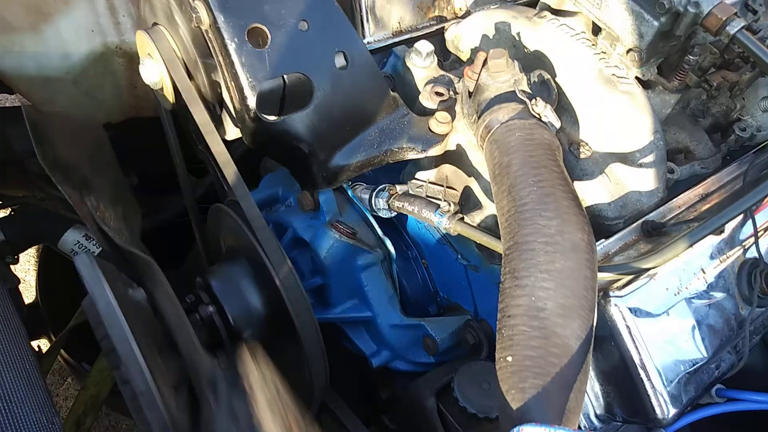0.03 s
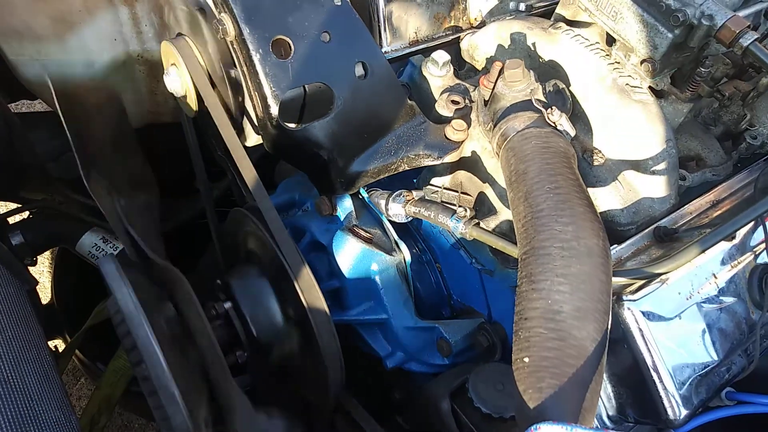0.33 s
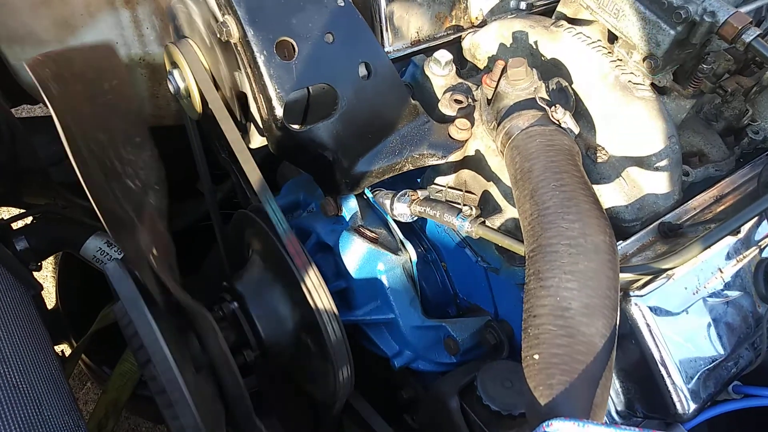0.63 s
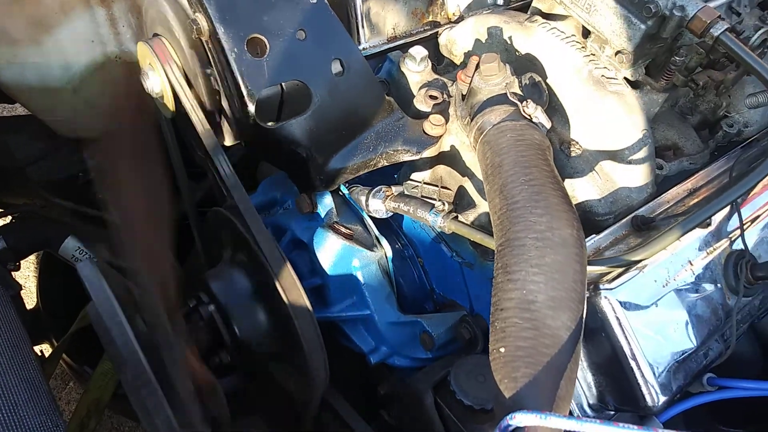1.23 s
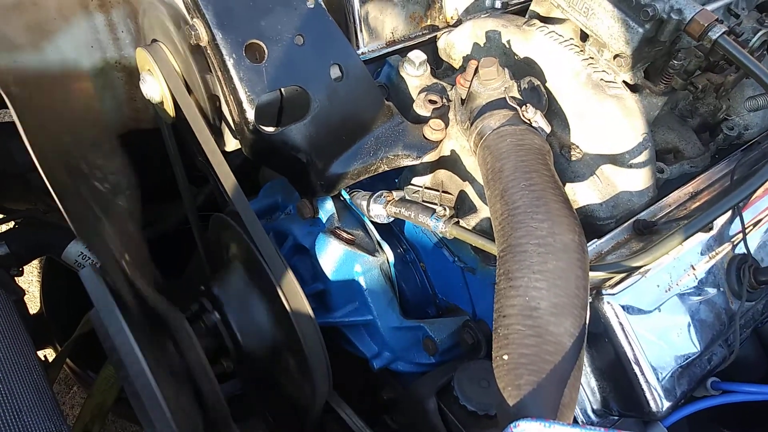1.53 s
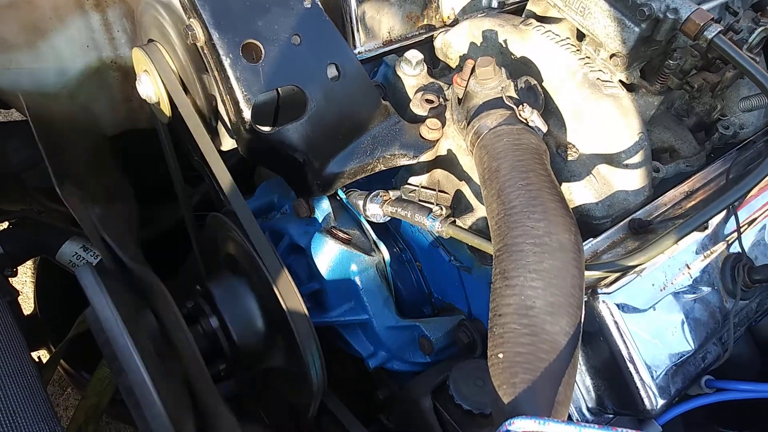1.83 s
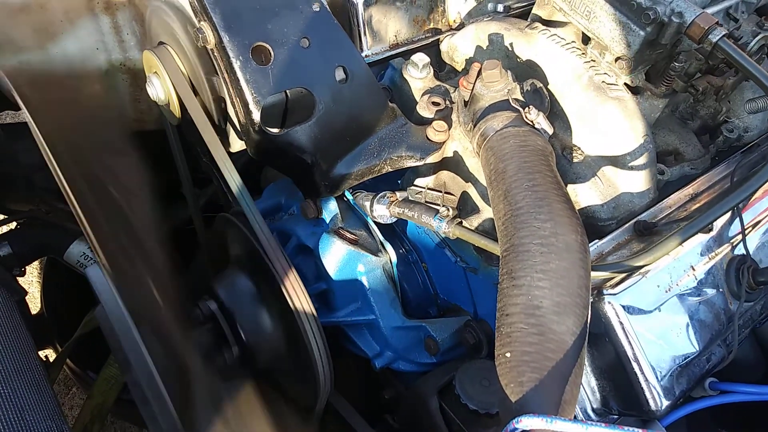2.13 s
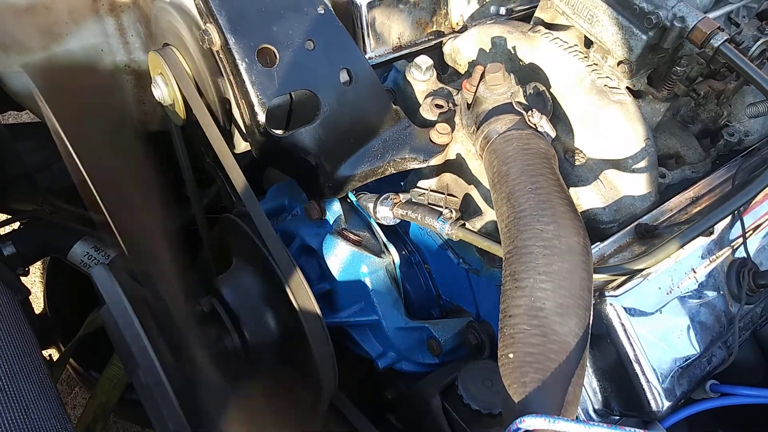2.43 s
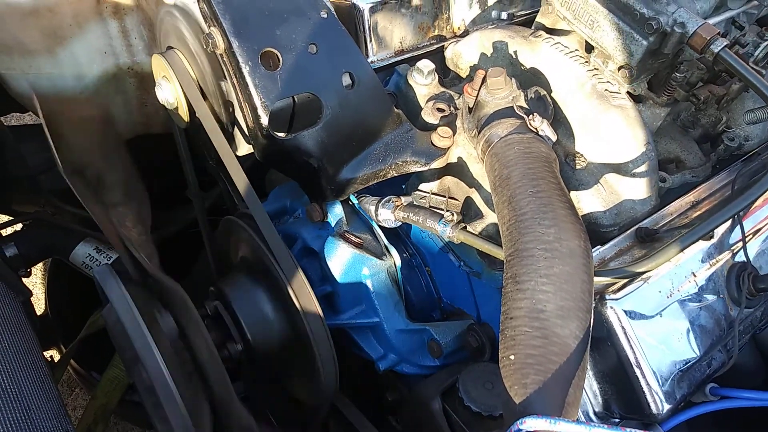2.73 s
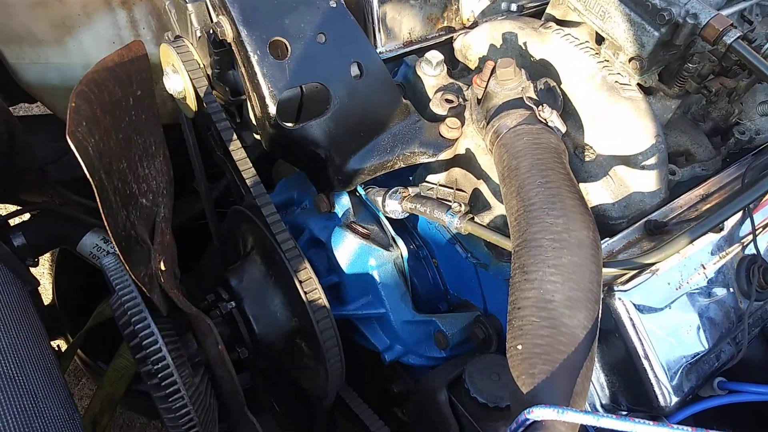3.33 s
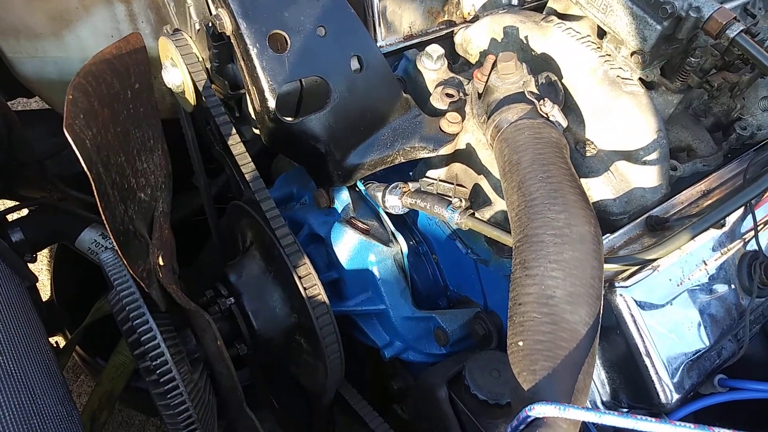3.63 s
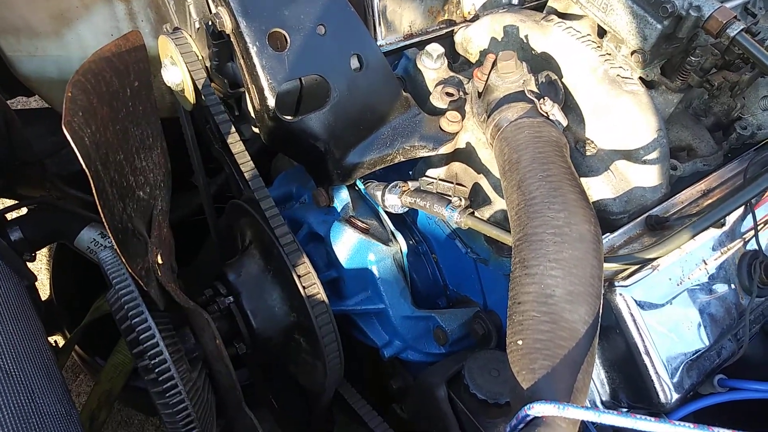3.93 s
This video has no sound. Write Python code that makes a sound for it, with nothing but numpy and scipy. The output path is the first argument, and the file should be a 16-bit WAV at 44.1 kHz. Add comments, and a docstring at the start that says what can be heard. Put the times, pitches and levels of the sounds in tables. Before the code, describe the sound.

A car engine throbs unevenly up close, misfires with pops and booms, then dies.

```python
"""Air rushes and throbs into a rough car engine, close by under an open hood; the intake honks each cycle.
The engine starts to misfire, spitting sharp pops and hollow, rising booms from the exhaust.
It blows out a bright spray and stalls: a whine runs down, a few parts tick and the last hiss drains away.
The loudest bangs overload and distort."""
import sys
import numpy as np
from scipy import signal
from scipy.fft import rfft, irfft
from scipy.io import wavfile
from scipy.ndimage import uniform_filter1d, minimum_filter1d

SR = 44100
rng = np.random.default_rng(int(sys.argv[2]) if len(sys.argv) > 2 else 0)


def dump_mix(stems):
    """Bounce the given channels to the path in sys.argv[1] as a 16-bit WAV at rate SR."""
    frames = np.atleast_2d(stems).T  # one column per channel
    limited = np.clip(frames, -1, 1)  # hard clip at full scale
    pcm = np.round(limited * 32767).astype(np.int16)
    wavfile.write(sys.argv[1], SR, pcm)


N = 176400
T = np.arange(N) / SR
FREQS = np.maximum(np.arange(N // 2 + 1) * SR / N, 1)

# How fast the engine fires. Each row: time in seconds, firings per second.
FIRING_RATE = [(0, 39), (.9, 53.4), (1.25, 35.2), (1.8, 50), (2.3, 42), (2.7, 20), (3.0, 14.2)]
# Loudness of the air and of the block and fan. Each row: time in seconds, level in dB.
RUSH_LEVEL = [(0, -12.5), (.9, -11.5), (1.35, -10), (1.7, -10.5), (1.9, -14), (1.94, -17.5), (1.97, -18.5),
              (2.03, -11.5), (2.19, -5.5), (2.225, -7.5), (2.29, -29), (2.4, -10.5), (2.5, -29), (2.9, -70),
              (4, -110)]
CLATTER_LEVEL = [(0, -26), (.88, -24), (.95, -27.5), (1.05, -18), (1.2, -25.5), (1.45, -23.5), (2.2, -21.5),
                 (2.85, -28), (3.02, -41.5), (3.2, -40.5), (3.4, -51)]
# Their tone, from bass to treble. Each row: frequency in Hz, level in dB.
RUSH_TONE = [(530, -27.5), (900, -8), (1100, -10.5), (1470, -6.5), (2000, -4.5), (2480, -6.5), (2930, -7.5),
             (3500, -1.5), (4820, -3), (6200, -4), (7500, -10), (9400, -25.5), (15500, -45.5)]
CLATTER_TONE = [(40, -18.5), (95, -0.5), (200, -17), (260, -2), (560, 0), (740, 4), (1100, -3),
                (1500, -7.5), (2500, -34)]
# Where the intake rings. Each row: frequency in Hz, width in Hz, boost in dB.
INTAKE_PEAKS = [(1480, 54, 1.5), (2199, 66, 10), (2356, 70, 6.5), (2750, 55, 7), (2943, 99, 11),
                (3950, 99, 5), (4130, 68, 6), (4800, 270, 7.5), (5310, 84, 5)]

def engine():
    """Rushing air and a clattering block throb as four uneven cylinders fire in turn."""
    firings = np.cumsum(curve(FIRING_RATE) * (1 + 0.039 * drift(11))) / SR
    cylinder_db = np.array([4, -9, -9.5, -21.5])
    strength = amp(cylinder_db[firings.astype(int) % 4])
    pulses = strength * np.exp(-(firings % 1) / 0.63)  # each fades until the next firing
    throb = unit(uniform_filter1d(1 + 0.85 * pulses, size=50))
    rush = flutter(hood_echo(noise(RUSH_TONE, INTAKE_PEAKS)), depth_db=2.5, rate=26)
    clatter = flutter(hood_echo(noise(CLATTER_TONE)), depth_db=0.5, rate=27)
    turning = burst(0, attack=1 / SR, hold=3.33, decay=0.045)
    return throb * (rush * loudness(RUSH_LEVEL) + clatter * loudness(CLATTER_LEVEL) * turning) * falter()

# Moments when the engine falters. Each row: start in seconds, length in seconds, dip in dB.
FALTER_DIPS = [(0.92, 0.15, 4.5), (1.363, 0.086, 4), (1.482, 0.052, 7), (1.917, 0.059, 3.5),
               (2.216, 0.036, 13), (2.423, 0.035, 16)]

def falter():
    """A gain that dips as the engine falters and its gas flow drops."""
    return amp(-sum(dip * swell(start, length, edge=.015) for start, length, dip in FALTER_DIPS))

# The honks. Each row: start in seconds, level in dB, starting pitch in Hz.
HONK_NOTES = [(-.03, -23.5, 495), (0.069, -23.5, 492.4), (.17, -21.5, 476), (.262, -22, 499),
              (0.359, -20, 501.3), (.445, -24.5, 502), (0.551, -23, 487), (.648, -19, 497.5),
              (.75, -21, 500), (.835, -24, 486), (1.275, -16, 575)]
# Where the intake's throat rings. Each row: frequency in Hz, width in Hz, level in dB.
THROAT_RINGS = [(860, 72, 3.5), (1436, 120, -1), (2274, 140, 0.5)]

def honks():
    """The intake gives rough, sagging honks whose overtones set its throat ringing."""
    length_s, pitch_sag = .085, 0.22
    base, overtones = np.zeros(N), np.zeros(N)
    wobble = 1 + .03 * drift(150)
    rasp = unit(amp(3 * drift(90)))
    for start, db, first_hz in HONK_NOTES:
        level = amp(db) * swell(start, length_s, edge=.025) * rasp
        on = level > 0
        phase = phase_of(first_hz * (1 - pitch_sag * (T[on] - start) / length_s) * wobble[on])
        base[on] += level[on] * sum(np.sin(k * phase) / k ** 2 for k in range(1, 7))
        overtones[on] += level[on] * sum(np.sin(k * phase) for k in range(2, 7))
    throat = sum(amp(db) * signal.lfilter(*signal.iirpeak(hz, hz / width, fs=SR), overtones + 1e-18)
                 for hz, width, db in THROAT_RINGS)
    return amp(-3.5) * base + throat

# The pops. Each row: start in seconds, spit level in dB, spit length in seconds, thud level in dB.
BACKFIRE_POPS = [(1.012, -3, 0.025, -7.5), (1.427, -3, 0.03, -22.5), (1.526, -8, 0.014, -15.5),
                 (1.812, -5, 0.022, -26.5), (1.87, -5.5, 0.011, -35.5), (1.952, 1.5, .015, -6.5),
                 (2.153, 0.5, 0.011, -14), (2.182, -2, 0.011, -16), (2.235, 3, 0.012, -2),
                 (2.393, -2.5, 0.018, -16.5)]
# The tone of each part. Each row: frequency in Hz, level in dB.
SPIT_TONE = [(400, -3.5), (1200, -8.5), (3000, -7), (4200, 0.5), (5500, 6.5), (7200, -0.5), (9000, -8.5),
             (12000, -17.5), (15500, -27)]
THUD_TONE = [(60, -21.5), (200, -14), (450, 3.5), (750, -6), (1250, -4), (2000, -8.5), (6000, -50)]

def backfires():
    """Each pop is a low thud, then at once a spit of gas."""
    spits = sum(amp(db) * burst(start, attack=0.0019, hold=length, decay=0.01)
                for start, db, length, _ in BACKFIRE_POPS)
    thuds = sum(amp(db) * burst(start - .004, attack=0.00079, hold=0.0026, decay=0.017)
                for start, _, _, db in BACKFIRE_POPS)
    return spits * hood_echo(noise(SPIT_TONE)) + thuds * noise(THUD_TONE)

# The booms. Each row: start and length in seconds, level in dB, first and last pitch in Hz.
MISFIRE_BOOMS = [(1.009, 0.17, -19, 94, 112.4), (1.444, 0.14, -11, 69.5, 140.6),
                 (1.548, 0.061, -16, 90.6, 128), (1.766, 0.16, -14.5, 86.2, 109.2),
                 (1.885, 0.097, -7, 89.4, 130.2), (1.953, 0.075, -6, 101.2, 123.6),
                 (2.125, 0.12, -10, 94.7, 137.5), (2.235, 0.076, -5.5, 106, 167.5),
                 (2.302, 0.14, -13.5, 109, 134), (2.398, 0.077, -9, 84, 170.5),
                 (2.568, 0.092, -12, 99.7, 108), (2.645, 0.13, -19, 66, 151), (2.787, .17, -28, 88.5, 78)]
# Loudness of the rumble and its deepest bass. Each row: time in seconds, level in dB.
RUMBLE_LEVEL = [(0, -47), (.97, -38), (1.03, -17), (1.22, -32.5), (1.29, -25), (1.37, -33), (1.44, -14.5),
                (1.62, -20), (1.72, -26.5), (1.8, -13), (2.02, -14.5), (2.1, -19), (2.2, -9.5),
                (2.7, -18.5), (2.88, -28.5), (3.02, -43.5), (3.5, -92)]
BASS_LEVEL = [(0, -49), (1.3, -62), (1.5, -29), (1.7, -50), (2.2, -34), (2.66, -21.5), (2.8, -47),
              (3.5, -84)]
# Their tone. Each row: frequency in Hz, level in dB.
RUMBLE_TONE = [(22, -19), (45, -21.5), (60, -15.5), (80, 3), (110, -6), (155, -3), (200, -17), (300, -21.5),
               (700, -68)]
BASS_TONE = [(20, -13.5), (60, 0), (85, -13), (200, -39)]

def exhaust():
    """Misfires set the gas in the pipe booming with a sliding pitch, over a rumble."""
    rumble = noise(RUMBLE_TONE) * loudness(RUMBLE_LEVEL)
    bass = noise(BASS_TONE) * loudness(BASS_LEVEL)
    return rumble + bass + glides(MISFIRE_BOOMS, edge=0.0398, wobble=1 + .025 * drift(46))

# Hard gulps of air. Each row: start in seconds, length in seconds, level in dB.
INTAKE_SURGES = [(0.918, 0.11, -13), (1.14, 0.15, -15), (1.635, 0.14, -9), (1.826, 0.11, -10.5),
                 (2.006, 0.23, -15.5)]

def surges():
    """Between misfires the intake draws harder and turns shrill."""
    level = sum(amp(db) * swell(start, length, edge=0.025) for start, length, db in INTAKE_SURGES)
    return hood_echo(resonance(hz=4720, width_hz=1040)) * level

# Rattles of loose metal. Each row: start in seconds, level in dB, pitch in Hz.
METAL_RINGS = [(.533, -14, 2310), (.637, -18.5, 2340), (.738, -17, 2960), (.968, -13, 2347),
               (1.105, -11.5, 2840), (1.147, -6, 3070), (1.815, -6, 5660), (2.328, -8, 4630)]

def chatter():
    """Loose metal is shaken into short, rough rings."""
    wobble = 1 + .018 * drift(250)
    return sum(amp(db) * burst(start, attack=.008, hold=0.015, decay=0.0057)
               * np.sin(phase_of(hz * wobble)) for start, db, hz in METAL_RINGS)

# Loudness of the spray and the hiss. Each row: time in seconds, level in dB.
SPRAY_LEVEL = [(0, -65), (.8, -34), (1.4, -21.5), (2.1, -18), (2.33, -9), (2.44, -13), (2.5, -12),
               (2.58, -9.5), (2.7, -16), (2.8, -30), (3.0, -67), (4, -110)]
HISS_LEVEL = [(2.3, -55), (2.6, -23), (2.85, -24.5), (3.0, -32), (3.15, -35), (3.25, -42), (3.38, -43),
              (3.58, -54), (3.66, -72.5), (4, -89)]
# Their tone. Each row: frequency in Hz, level in dB.
SPRAY_TONE = [(530, -35.5), (900, -2), (1450, -16.5), (1910, -2.5), (2890, -20), (3890, -2.5), (5700, -3),
              (6270, -1.5), (7230, 3), (9740, -12.5), (10800, -11.5), (15500, -27)]
HISS_TONE = [(590, -46), (1000, -16.5), (1250, -21.5), (1500, 1.5), (2150, 3), (2900, -8.5), (3900, 1.5),
             (5460, 2.5), (6800, 0.5), (8500, -8), (10500, -14.5), (15500, -37.5)]
# Where both ring. Each row: frequency in Hz, width in Hz, boost in dB.
ESCAPE_PEAKS = [(1570, 110, 3.5), (1876, 150, 1.4), (2203, 48, 7), (2550, 100, 7), (3250, 130, 6),
                (3846, 170, 4.4), (4600, 180, 3), (5620, 100, 7.8), (6000, 70, 6.35)]

def spray_and_hiss():
    """The dying engine blows out a grainy spray, then air drains away with a hiss."""
    spray = hood_echo(noise(SPRAY_TONE, ESCAPE_PEAKS))
    grain = amp(2.5 * drift(320))
    hiss = flutter(noise(HISS_TONE, ESCAPE_PEAKS), depth_db=2.0, rate=41)
    return unit(spray * grain) * loudness(SPRAY_LEVEL) * falter() + hiss * loudness(HISS_LEVEL)

# Loudness of two airy notes. Each row: time in seconds, level in dB.
HOLLOW_LEVEL = [(2.3, -60), (2.6, -34), (2.87, -29), (3.0, -40), (3.15, -36.5), (3.25, -47), (3.37, -45),
                (3.5, -56.5), (3.59, -55.5), (3.66, -78.5), (4, -102)]
THIN_LEVEL = [(2.9, -61), (3.3, -51), (3.58, -58.5), (3.78, -81), (4, -86)]
# Where they ring. Each row: frequency in Hz, width in Hz, level in dB.
HOLLOW_RINGS = [(706, 24, -4), (653, 33, -13.5), (842, 23, -10)]
THIN_RINGS = [(1614, 51, -3.5), (2520, 70, 1), (4450, 91, -1.5), (5410, 80, -7.5), (6720, 70, 5.5)]

def air_notes():
    """Escaping air blows a hollow note and a thin, high ring."""
    return blown(HOLLOW_RINGS) * loudness(HOLLOW_LEVEL) + blown(THIN_RINGS) * loudness(THIN_LEVEL)

# The falling whine. Each row: time in seconds, pitch in Hz, level in dB.
WHINE_PATH = [(2.45, 345, -63), (2.6, 312, -22), (2.75, 273, -28.5), (2.88, 253, -30), (3.0, 241, -48.5),
              (3.27, 187.6, -50), (3.42, 171.4, -75)]

def whine():
    """A wavering whine falls as the engine runs down."""
    hz = curve(WHINE_PATH) * (1 + 0.022 * drift(40))
    return np.sin(phase_of(hz)) * amp(curve(WHINE_PATH, column=2))

# The ticks. Each row: start in seconds, level in dB.
PART_TICKS = [(2.832, -15), (2.913, -21.5), (3.104, -34), (3.167, -29), (3.209, -43), (3.294, -41)]
# Their tone. Each row: frequency in Hz, level in dB.
TICK_TONE = [(150, -4), (330, 14), (900, -20), (1900, 7), (3000, -5), (6000, 7.5), (15000, -31)]

def ticks():
    """Parts tick as they stop moving."""
    level = sum(amp(db) * burst(start, attack=0.0017, hold=0.0029, decay=0.0096)
                for start, db in PART_TICKS)
    return noise(TICK_TONE) * level

# The squeal. Each row: start and length in seconds, level in dB, first and last pitch in Hz.
BELT_NOTE = [(3.07, 0.101, -35, 688, 721)]

def belt_squeal():
    """The belt squeals thinly as it comes to rest."""
    return glides(BELT_NOTE, edge=.03, wobble=1 + .01 * drift(60))

# Loudness of the squeak. Each row: time in seconds, level in dB.
SQUEAK_LEVEL = [(3.87, -100), (3.93, -71), (3.97, -61.5), (4, -78)]

def squeak():
    """A faint, high squeak at the very end."""
    return resonance(hz=7500, width_hz=260) * loudness(SQUEAK_LEVEL)

# Tone of the background. Each row: frequency in Hz, level in dB.
OUTDOOR_TONE = [(25, -12.5), (75, 1), (360, -9.5), (600, -21), (9000, -33), (15000, -58.5)]

def outdoors():
    """Quiet, steady outdoor noise."""
    return amp(-68.5) * noise(OUTDOOR_TONE)

def hood_echo(x):
    """Close echoes from the hood and metal walls add a tinny ring that keeps shifting."""
    decay_s = .012
    echoes = rng.standard_normal((2, N)) * np.exp(-np.minimum(T / decay_s, 20))
    first, second = irfft(rfft(x) * rfft(unit(echoes)) / np.sqrt(N), N)
    blend = np.pi / 2 * drift(4)
    return unit(x + .5 * (np.cos(blend) * first + np.sin(blend) * second))

def amp(db):
    """Turn decibels into a gain to multiply by."""
    return 10 ** (np.asarray(db) / 20)

def unit(x):
    """Scale to an average strength (rms) of 1."""
    return x / np.sqrt(np.mean(x ** 2) + 1e-20)

def curve(rows, column=1):
    """Join a table's values with straight lines in time."""
    rows = np.array(rows)
    return np.interp(T, rows[:, 0], rows[:, column])

def loudness(rows):
    """A gain that follows a table of times and dB levels."""
    return amp(curve(rows))

def drift(rate):
    """A random wander of about 1 either way, mostly slower than rate in Hz."""
    size = N // 20
    slow = irfft(rfft(rng.standard_normal(size)) / (1 + (FREQS[:size // 2 + 1] / rate) ** 2), size)
    return np.interp(T, np.arange(size) * 20 / SR, unit(slow))

def noise(tone, peaks=()):
    """Noise with a broad tone and narrow ringing peaks, cut off below the tone's first row."""
    hz, db = np.transpose(tone)
    shape_db = np.interp(np.log(FREQS), np.log(hz), db)
    for centre, width, boost in peaks:
        shape_db += boost / (1 + (2 * (FREQS - centre) / width) ** 2)
    bass_cut = 1 + (hz[0] / FREQS / np.sqrt(2)) ** 4
    return unit(irfft(rfft(rng.standard_normal(N)) * amp(shape_db) / bass_cut, N))

def resonance(hz, width_hz):
    """Swirling air ringing around one pitch."""
    return unit(irfft(rfft(rng.standard_normal(N)) / (1 + ((FREQS - hz) / width_hz) ** 2), N))

def blown(rings):
    """Several resonances blown together."""
    return unit(sum(amp(db) * resonance(hz, width) for hz, width, db in rings))

def flutter(x, depth_db, rate, bands=10):
    """Each band, from low to high, swells and fades at random."""
    spectrum = rfft(x)
    place = np.interp(np.log(FREQS), np.log([300, 14000]), [0, bands - 1])
    parts = (irfft(spectrum * np.maximum(1 - abs(place - k), 0), N) for k in range(bands))
    return unit(sum(part * amp(depth_db * drift(rate)) for part in parts))

def burst(start, attack, hold, decay):
    """A level that rises, then dies away from hold seconds after its start."""
    age = T - start
    return np.clip(age / attack, 0, 1) * np.exp(-np.clip((age - hold) / decay, 0, 20))

def swell(start, length, edge):
    """A level that fades smoothly in and out, each fade lasting edge seconds."""
    rise = np.clip(np.minimum(T - start, start + length - T) / edge + 0.34, 0, 1)
    return rise * rise * (3 - 2 * rise)

def phase_of(hz):
    """The running angle of a wave whose pitch moves."""
    return 2 * np.pi * np.cumsum(hz) / SR

def glides(rows, edge, wobble):
    """Short notes, each sliding from its first pitch to its last."""
    out = np.zeros(N)
    for start, length, db, first_hz, last_hz in rows:
        level = amp(db) * swell(start, length, edge)
        on = level > 0
        hz = np.interp(T[on], [start, start + length], [first_hz, last_hz]) * wobble[on]
        out[on] += level[on] * np.sqrt(2) * np.sin(phase_of(hz))
    return out

def scene():
    """The engine runs, misfires and stalls outdoors, in one channel."""
    running = engine() + chatter() + surges() + honks()
    misfiring = backfires() + exhaust()
    stalling = spray_and_hiss() + air_notes() + whine() + ticks() + squeak() + belt_squeal()
    return (running + misfiring + stalling + outdoors())[None]

def record(dry):
    """A fast limiter turns the peaks down, what is still too loud clips, and the top treble is cut."""
    threshold, most_db, release_db_per_s, smooth_samples = .7, 7.3, 1997.5, 41
    ceiling, hardness, cutoff_hz = .73, 24, 15830
    x = dry[0] * amp(2.8)
    over_db = np.minimum(20 * np.log10(np.maximum(abs(x) / threshold, 1)), most_db)
    held_db = np.maximum.accumulate(over_db + release_db_per_s * T) - release_db_per_s * T
    limited = x * amp(uniform_filter1d(minimum_filter1d(-held_db, smooth_samples), smooth_samples))
    clipped = limited / (1 + abs(limited / ceiling) ** hardness) ** (1 / hardness)
    treble_cut = signal.firwin(801, cutoff_hz, window="blackman", fs=SR)
    return signal.fftconvolve(clipped, treble_cut, "same")[None]

dry = scene()
out = record(dry)
dump_mix(out)
```